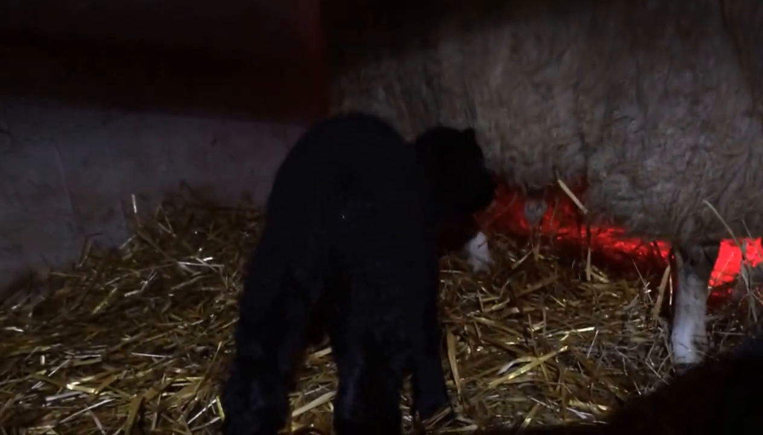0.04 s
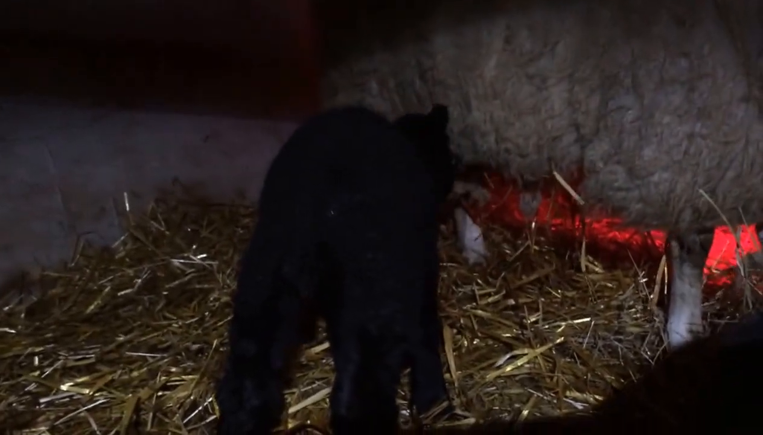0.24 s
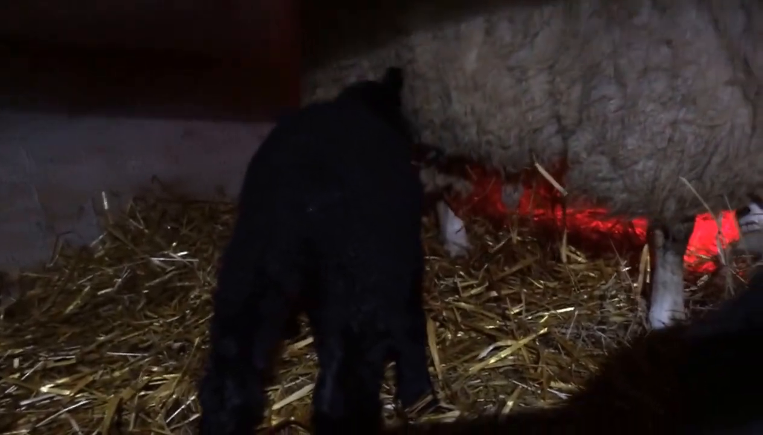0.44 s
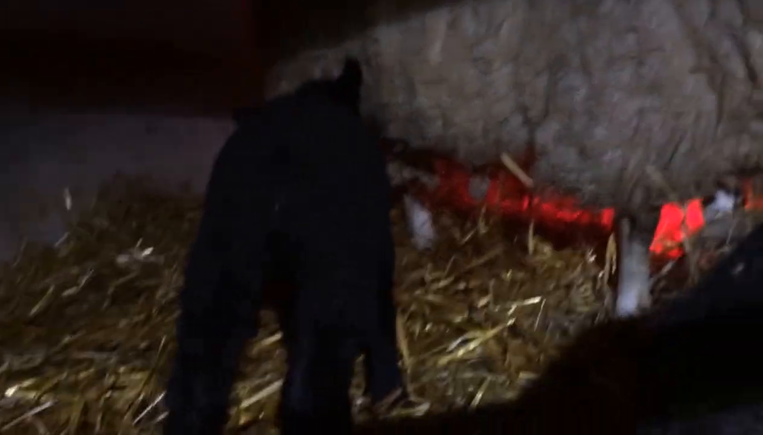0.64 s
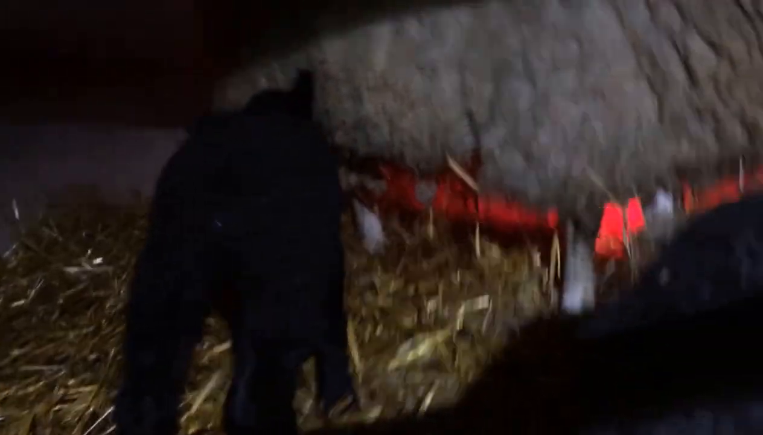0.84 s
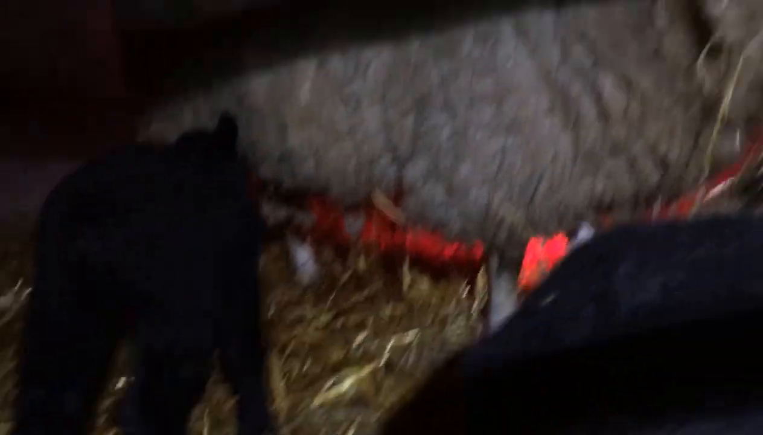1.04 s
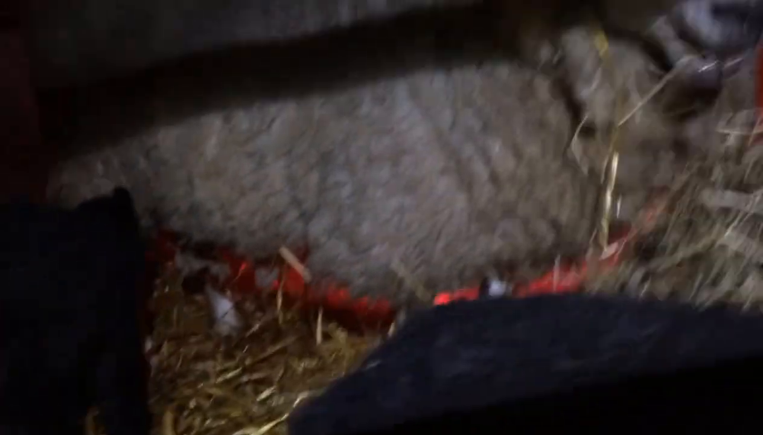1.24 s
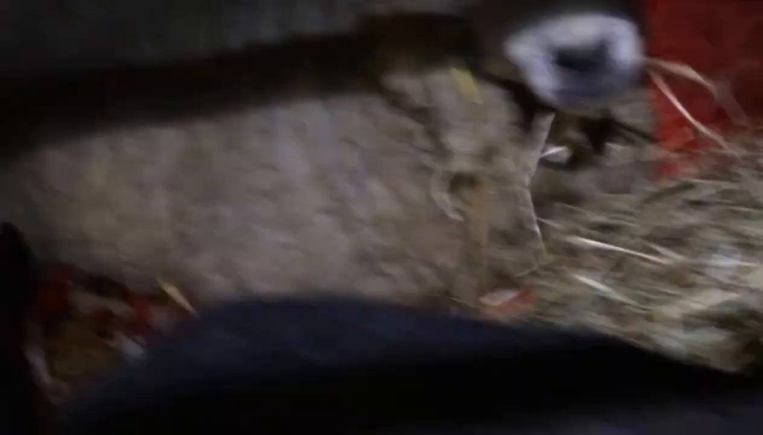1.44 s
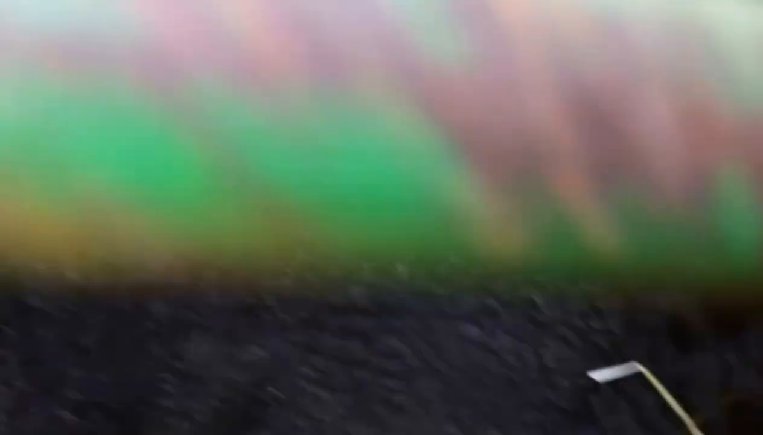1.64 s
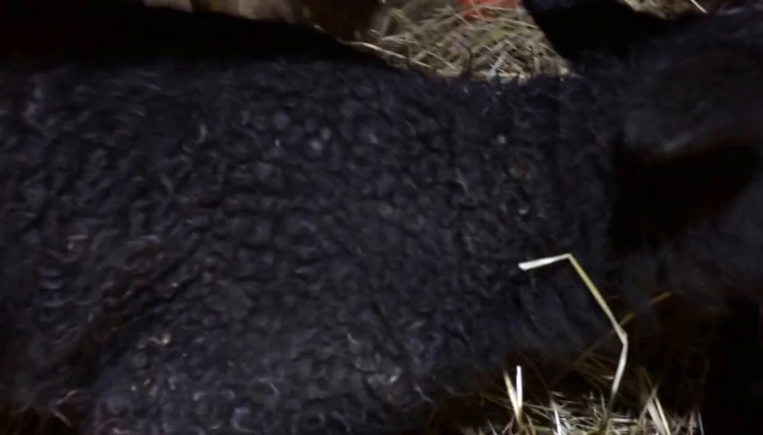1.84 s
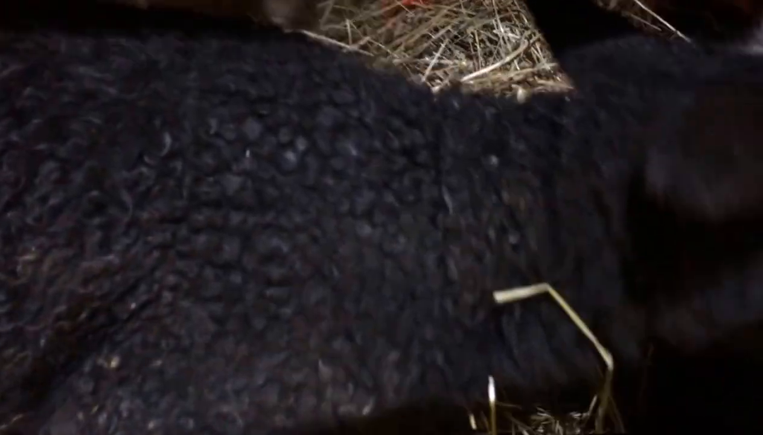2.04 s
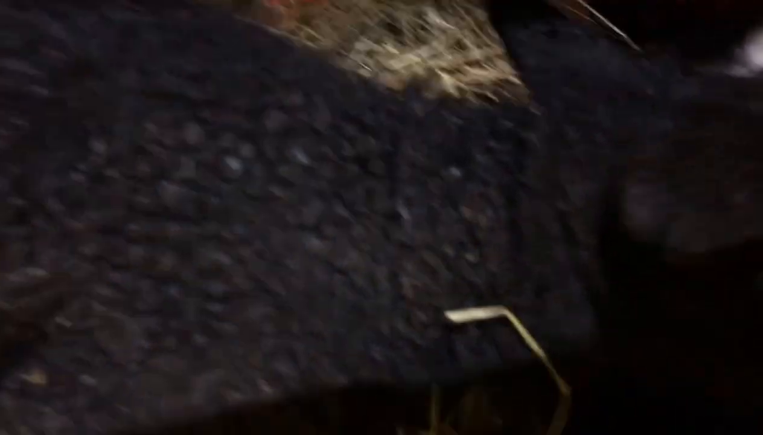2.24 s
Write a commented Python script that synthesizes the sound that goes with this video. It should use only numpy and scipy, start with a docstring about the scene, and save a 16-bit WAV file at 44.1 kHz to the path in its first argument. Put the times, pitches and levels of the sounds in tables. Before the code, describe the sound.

One long lamb bleat wavers and sags in pitch up close, overlapping the fading call of a fainter, lower sheep. Then come light hoof knocks and snapping stalks in the straw of a quiet indoor pen.

```python
"""In a straw pen, a lamb bleats close by: it starts with a shut mouth, opens wide, quavers and sags
as the mouth closes. Further off, a deeper, hoarse sheep is ending its own call. Both voices are
vocal fold pulses coloured by a throat. Hooves shift and thud in the straw, mostly after the bleat,
and stalks snap. The shed adds a short echo, over a bed of quiet air, low rumble and tiny ticks."""
import sys
import numpy as np
from scipy import signal
from scipy.fft import rfft, irfft, next_fast_len
from scipy.io import wavfile
from scipy.ndimage import map_coordinates

SR = 44100
rng = np.random.default_rng(int(sys.argv[2]) if len(sys.argv) > 2 else 0)


def to_wav(s):
    """Save 16-bit WAV."""
    ch = np.atleast_2d(s).T  # columns
    pcm = np.round(np.clip(ch, -1, 1) * 32767)  # PCM
    wavfile.write(sys.argv[1], SR, pcm.astype(np.int16))


N = 105840

# tone of the air, the rumble and the ticking stalks (frequency [Hz], level [dB])
AIR_COLOUR = [(60,-17.5),(160,-17),(300,-24),(650,-24),(1020,-26.5),(9300,-31.5)]
RUMBLE_COLOUR = [(20,-19),(70,-1),(170,-3),(300,-27.5),(1000,-59)]
STALK_COLOUR = [(500,-13),(3000,-4.5),(15000,-5)]
# fader rides for the air and the rumble (time [s], level [dB])
AIR_FADER = [(1.88,-58.8),(1.94,-61),(2.33,-56.8)]
RUMBLE_FADER = [(0.3,-64),(1.0,-79),(1.1,-56.5),(1.28,-70),(1.42,-54.5),(1.76,-69),(1.88,-60),(2.4,-61)]

# the far sheep's sinking call (time [s], pitch [Hz], level [dB])
SHEEP_CALL = [(0,178.8,-36.5),(0.1,175.3,-32.5),(0.135,174.9,-37.5),(0.2,168.8,-27.5),(0.24,168.7,-37),(0.315,168,-28),(0.38,162.1,-32.5),(0.46,157.4,-35),(0.53,160.6,-41.5),(0.58,152,-70)]
# its throat (frequency [Hz], level [dB])
SHEEP_COLOUR = [(175,-24),(350,-10.5),(520,-13),(660,4.5),(710,-1.5),(880,-18.5),(1100,-11),(1420,-8.5),(1580,2.5),(1900,-14.5),(2350,-9),(2750,-8.5),(3200,-21.5),(5000,-33),(12000,-45)]

# tone of crushed straw (frequency [Hz], level [dB])
STRAW_COLOUR = [(150,-49),(260,-13),(544,-3.5),(705,-12),(1100,-13),(2100,-7.5),(4240,-22),(7250,-25.5),(15500,-35)]
# stalks snapping (time [s], level [dB], treble tilt [dB/octave])
STALK_SNAPS = [(0.068,-35,6.5),(1.423,-45,0.5),(1.482,-38,-2),(1.488,-34,0.5),(1.505,-35.5,2),(1.778,-46,6.5),(1.831,-44,0),(1.85,-40,-8),(1.865,-37.5,0),(1.98,-52,2),(2.052,-47,5),(2.07,-48,-1),(2.233,-34,-3),(2.248,-32.5,3.5),(2.269,-36.5,0)]
# dull knocks on the bedding (time [s], pitch [Hz], level [dB], t60 [s])
BEDDING_THUDS = [(0.095,172,-39,0.19),(0.454,147,-39,.1),(1.385,125,-45,.12),(1.506,170,-38.5,0.16),(1.752,673,-48,0.063),(1.842,438,-35,.05),(1.863,420,-36,0.034),(1.864,169,-35.5,0.086),(1.988,156,-37.5,0.11),(2.203,609,-40,0.14),(2.245,530,-27,0.03),(2.265,140,-39.5,0.049)]
# hooves pressing the straw (peak time [s], rise [s], fall [s], level [dB])
HOOF_PRESSES = [(1.129,0.039,.03,-47.5),(1.34,0.02,0.025,-53.5),(1.488,0.04,0.033,-50.5),(1.77,.02,.015,-61),(1.843,0.02,0.016,-49.5),(2.234,0.0263,0.023,-45)]

# the lamb's quaver and final sag (time [s], pitch [Hz])
LAMB_PITCH = [(0.185,369),(0.214,384),(0.226,410),(0.25,412),(0.268,397),(0.286,402.3),(0.3,369.3),(0.314,413.9),(0.35,402),(0.376,373.4),(0.404,383.6),
              (0.416,368),(0.44,394.9),(0.46,382),(0.486,400),(0.502,374),(0.526,388),(0.55,383.5),(0.57,396.7),(0.584,372),
              (0.646,398.5),(0.678,387),(0.699,394),(0.73,384),(0.782,384),(0.801,374),(0.826,385),(0.874,376),(0.892,366.5),(0.958,364.1),(1.024,350.9),(1.04,331.3),(1.072,332.2),(1.09,302)]
# its envelope (time [s], level [dB])
LAMB_LEVEL = [(0.15,-77),(0.184,-40),(0.215,-39.5),(0.231,-32),(0.256,-35.5),(0.277,-22),(0.289,-18.5),(0.304,-24),(0.325,-21),(0.352,-15.5),(0.365,-17.5),(0.395,-15.5),(0.421,-20),(0.47,-17.5),(0.671,-18.5),(0.791,-18),(0.853,-17),(0.898,-20),(1.005,-18),(1.049,-21.5),(1.083,-24.5),(1.098,-37),(1.109,-81.5)]
# its hoarseness (time [s], noise share of the low harmonics [0-1])
LAMB_ROUGHNESS = [(0.2,0.03),(0.285,0.015),(0.31,.06),(0.34,0.035),(0.42,0.035),(0.58,0.001),(1.0,0),(1.04,0.015),(1.1,0.06)]
# its mouth move (time [s], position [0 shut, 1 opening, 2 wide, 3 closing])
MOUTH_POSITION = [(0.258,0),(0.285,1),(0.362,1.4),(0.38,2.35),(0.5,2.35),(0.72,2),(0.8,2.5),(0.875,2.62),(0.895,3)]
# throat colour in each mouth position (frequency [Hz], level [dB])
SHUT_COLOUR = [(350,-14.5),(750,-1),(1200,-15),(2600,-12),(3700,-18.5),(4450,0),(5100,-8),(5800,-4.5),(6600,-38.5),(7400,-12),(8200,-39),(15000,-41.5)]
OPENING_COLOUR = [(350,-24),(800,-14.5),(981,-17.5),(1200,1.5),(1580,-16.5),(2000,-9),(2420,-14),(3120,-21.5),(3650,-16.5),(4100,-8.5),(4480,1),(4870,-2),(5250,-14.5),(5650,2.5),(6200,-23),(7000,-7.5),(7900,-23),(8600,-21),(9700,-32),(13200,-23.5),(15500,-29)]
WIDE_COLOUR = [(210,-72),(385,-32),(770,-15),(930,-30.5),(1140,4.5),(1540,1),(1940,-3),(2330,-10.5),(2660,-30),(3100,-19),(3480,-1),(3870,-3.5),(4270,2),(4650,-3.5),(5050,-4),(5450,0),(5850,-16),(7000,-13.5),(8150,-31),(9040,-41.5),(10300,-21),(11700,-30),(13700,-26),(15500,-36)]
CLOSING_COLOUR = [(190,-49),(360,-22.5),(512,-40),(700,-18),(920,-17),(1080,-15),(1380,2.5),(1500,3),(1750,-20),(2540,-33),(2900,-16.5),(3600,-11.5),(4050,-23.5),(4600,-8),(5350,-9),(5950,-4),(6800,-14.5),(7500,-28),(8300,-24),(8900,-48.5),(12300,-30),(15500,-56)]
# the throat shortens at the end and lifts its resonances (time [s], frequency scale [ratio])
THROAT_LIFT = [(0.82,1.02),(0.9,0.99),(0.98,0.978),(1.08,1.045)]
# the piercing upper resonance (time [s], centre [Hz], boost [dB])
UPPER_RING = [(0.2,4430,6),(0.26,4475,-4),(0.36,4950,6),(0.41,4640,7.5),(0.48,4350,6.5),(0.73,4163,2),(0.8,4620,8.5),(0.86,4760,13),(0.93,4750,9),(1.0,5000,1),(1.037,5650,8),(1.085,6500,7)]
# a higher one that flashes as the lips part (time [s], centre [Hz], boost [dB])
LIP_SQUEAK = [(0.25,8200,-2),(0.27,7970,22),(0.295,8440,13.5),(0.315,8620,1.5)]

# the shed's decay (frequency [Hz], t60 [s])
SHED_DECAY = [(200,0.31),(1400,0.47),(5000,0.27),(12000,0.067)]

LOW_CUT_HZ, TOP_HZ = 42, 15700
SHEEP_SEND_DB, STRAW_SEND_DB, LAMB_SEND_DB = -11, -17.5, -16.5


def amp(db):
    """Decibels to gain."""
    return 10 ** (np.asarray(db) / 20)


def unit(x):
    """Scale to rms 1."""
    return x / np.sqrt(np.mean(x ** 2) + 1e-20)


def along(points, hz):
    """Read a curve at hz, on a log frequency axis."""
    freqs, values = np.transpose(points)
    return np.interp(np.log(hz + 1), np.log(freqs + 1), values)


def curves(rows, t):
    """Automation lanes: each column after the first, at times t."""
    times, *lanes = np.transpose(rows)
    return [np.interp(t, times, lane) for lane in lanes]


def wobble(rate, t):
    """A smooth random curve with rate knots per unit of t."""
    return map_coordinates(rng.standard_normal(4096), [t * rate], mode="wrap")


def filtered(x, gain):
    """EQ x with a gain that depends on frequency."""
    size = next_fast_len(len(x) + 8192)
    return irfft(rfft(x, size) * gain(np.fft.rfftfreq(size, 1 / SR)), size)[:len(x)]


def noise(colour, size=N):
    """Coloured noise of rms 1."""
    return unit(filtered(rng.standard_normal(size), lambda hz: amp(along(colour, hz))))


def add(track, start, x):
    """Mix x in at start seconds."""
    part = track[int(start * SR):][:len(x)]
    part += x[:len(part)]


def air(t):
    """Room tone: a soft, gently wavering hiss."""
    return noise(AIR_COLOUR) * amp(curves(AIR_FADER, t)[0] + wobble(9.3, t))


def rumble(t, swell_db=2.5):
    """A faint handling rumble that comes in stronger swells after the bleat."""
    return noise(RUMBLE_COLOUR) * amp(curves(RUMBLE_FADER, t)[0] + swell_db * wobble(18, t))


def ticks(per_second=35, level_db=-56, spread_db=3.5, t60=.008):
    """Settling straw crackles in tiny random bursts throughout."""
    hits = (rng.random(N) < per_second / SR) * amp(level_db + spread_db * rng.standard_normal(N))
    age = np.arange(SR // 20) / SR
    return noise(STALK_COLOUR) * signal.fftconvolve(hits, amp(-60 * age / t60))[:N]


def throat(colour, hz):
    """Log gain (real) and phase (imaginary) of a throat, as a minimum-phase filter."""
    grid = np.fft.rfftfreq(2048, 1 / SR)
    cepstrum = irfft(np.log(amp(along(colour, grid))))
    cepstrum[1:len(grid) - 1] *= 2
    cepstrum[len(grid):] = 0
    return np.interp(hz, grid, rfft(cepstrum))


def voice(t, pitch, response, rough, rasp_hz, flutter_db, flutter_hz=3200, hiss_hz=14500):
    """Vocal fold harmonics through a throat; each flutters and smears into rasp, the high ones most."""
    harmonic = np.arange(1, int(TOP_HZ / pitch.mean()) + 3)[:, None]
    hz = harmonic * pitch
    wobbles = lambda rate: np.array([wobble(rate, t) for _ in harmonic])
    depth = np.sqrt(np.minimum(hz / flutter_hz, 2))
    phase_flutter = .19 * depth * wobbles(70)
    gain = np.exp(response(hz) + 1j * phase_flutter) * amp(flutter_db * depth * wobbles(70))
    gain /= np.sqrt(np.sum(abs(gain) ** 2, axis=0) / 2)  # the colour moves, the power holds
    # grit grows above rasp_hz; above hiss_hz even a clear note is mostly hiss
    noise_share = np.clip(rough * (1 + (hz / rasp_hz) ** 4) + (hz / hiss_hz) ** 8, 0, .9)
    rasp = (wobbles(pitch.mean()) + 1j * wobbles(pitch.mean())) / np.sqrt(2)
    partials = gain * (np.sqrt(1 - noise_share) + np.sqrt(noise_share) * rasp)
    return np.sum(partials * np.exp(2j * np.pi * harmonic * np.cumsum(pitch) / SR), axis=0).real


def sheep(jitter=.006):
    """A low, hoarse call through a steady throat, sinking and fading under the lamb's."""
    t = np.arange(int(SHEEP_CALL[-1][0] * SR)) / SR
    pitch, level = curves(SHEEP_CALL, t)
    pitch *= 1 + jitter * wobble(60, t)
    call = voice(t, pitch, lambda hz: throat(SHEEP_COLOUR, hz), rough=.07, rasp_hz=1370, flutter_db=4)
    return np.pad(call * amp(level), (0, N - len(t)))


def snaps(t60=.016):
    """Single stalks break: short noise bursts, each with its own brightness."""
    out = np.zeros(N)
    age = np.arange(SR // 4) / SR
    for start, db, tilt in STALK_SNAPS:
        colour = [(hz, band_db + tilt * np.log2(hz + 1)) for hz, band_db in STRAW_COLOUR]
        add(out, start, noise(colour, len(age)) * amp(db - 60 * age / t60))
    return out


def thuds(attack_s=.0022):
    """Hooves knock the bedding: damped low tones, roughened by phase wobble."""
    out = np.zeros(N)
    age = np.arange(SR // 4) / SR
    for start, hz, db, t60 in BEDDING_THUDS:
        body = np.sin(2 * np.pi * hz * age + .6 * wobble(hz / 3, age))
        add(out, start, body * amp(db - 60 * age / t60) * (1 - np.exp(-age / attack_s)))
    return out


def lamb_throat(t, hz, ring_width_hz=260, scatter_rad=.9, scatter_hz=450):
    """A morph through four mouth shapes plus two bright peaks; close surfaces scatter the phases."""
    mouth, lift = [curves(lane, t)[0] for lane in (MOUTH_POSITION, THROAT_LIFT)]
    colours = (SHUT_COLOUR, OPENING_COLOUR, WIDE_COLOUR, CLOSING_COLOUR)
    shape = sum(np.maximum(0, 1 - abs(mouth - position)) * throat(colour, hz / lift)
                for position, colour in enumerate(colours))
    for centre, db in (curves(UPPER_RING, t), curves(LIP_SQUEAK, t)):
        shape += np.log(amp(db)) / (1 + 1j * (hz - centre) / ring_width_hz)
    grid = np.arange(0, SR / 2, 20)
    return shape + 1j * scatter_rad * np.interp(hz, grid, wobble(1 / scatter_hz, grid))


def lamb(jitter=.0025, tremble=.002, shimmer_db=.7):
    """One long, close bleat: unsteady vocal folds sing through the moving throat."""
    t = np.arange(int(LAMB_LEVEL[-1][0] * SR)) / SR
    pitch, level, rough = [curves(lane, t)[0] for lane in (LAMB_PITCH, LAMB_LEVEL, LAMB_ROUGHNESS)]
    pitch *= 1 + jitter * wobble(250, t) + tremble * wobble(70, t)
    bleat = voice(t, pitch, lambda hz: lamb_throat(t, hz), rough, rasp_hz=4800, flutter_db=2.5)
    return np.pad(bleat * amp(level + shimmer_db * wobble(120, t)), (0, N - len(t)))


def wall(x, notches_hz=(1120, 1580), width_hz=25, depth=.95):
    """Reflections cancel two narrow bands; a harmonic drops out as the quaver carries it across one."""
    notch = lambda hz, centre: 1 - depth / (1 + 1j * (hz - centre) / width_hz)
    return filtered(x, lambda hz: np.prod([notch(hz, centre) for centre in notches_hz], axis=0))


def rustle(t, grain_db=4):
    """Each hoof presses the straw into a grainy swell."""
    pressure = sum(amp(db) * np.exp(-((t - peak) / np.where(t < peak, rise, fall)) ** 2)
                   for peak, rise, fall, db in HOOF_PRESSES)
    return pressure * unit(noise(STRAW_COLOUR) * amp(grain_db * wobble(600, t)))


def shed_echo(send):
    """The shed's short reverb, with 4 ms of pre-delay; the treble dies first."""
    hz, t, bands = signal.stft(rng.standard_normal(SR // 2), SR, nperseg=256)
    decay = amp(-60 * t / along(SHED_DECAY, hz)[:, None])
    tail = signal.istft(bands * decay, SR, nperseg=256)[1]
    return signal.fftconvolve(send, np.pad(tail / np.linalg.norm(tail), (SR // 250, 0)))[:N]


def scene():
    """The mono mix: both animals and the hooves feed the echo, over the quiet bed."""
    t = np.arange(N) / SR
    near, far = wall(lamb()), sheep()
    hooves = rustle(t) + snaps() + thuds()
    echo = shed_echo(amp(LAMB_SEND_DB) * near + amp(SHEEP_SEND_DB) * far + amp(STRAW_SEND_DB) * hooves)
    return (near + far + hooves + echo + air(t) + rumble(t) + ticks())[None]


def record(dry):
    """The microphone rolls off the deep bass and keeps nothing above its band limit."""
    return filtered(dry[0], lambda hz: (hz < TOP_HZ) * hz ** 2 / np.hypot(hz ** 2, LOW_CUT_HZ ** 2))[None]


dry = scene()
out = record(dry)
to_wav(out)
```